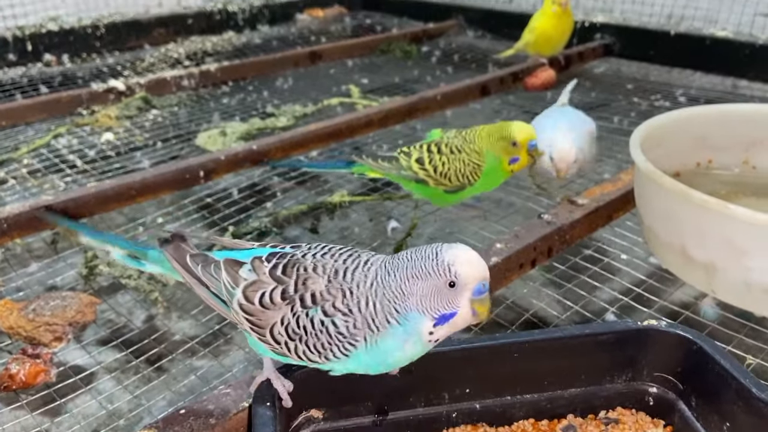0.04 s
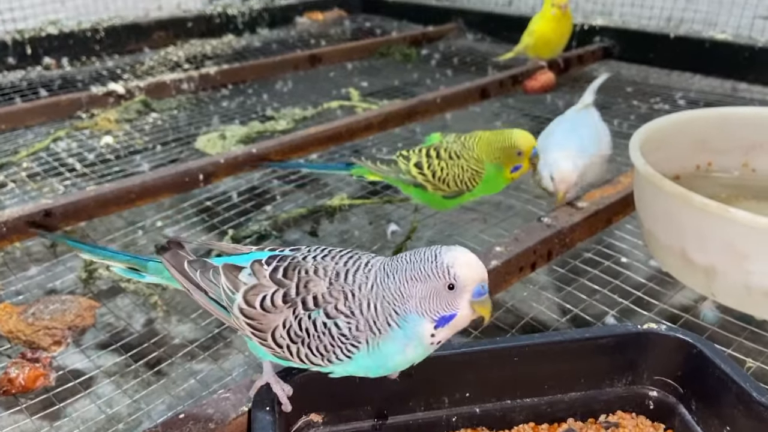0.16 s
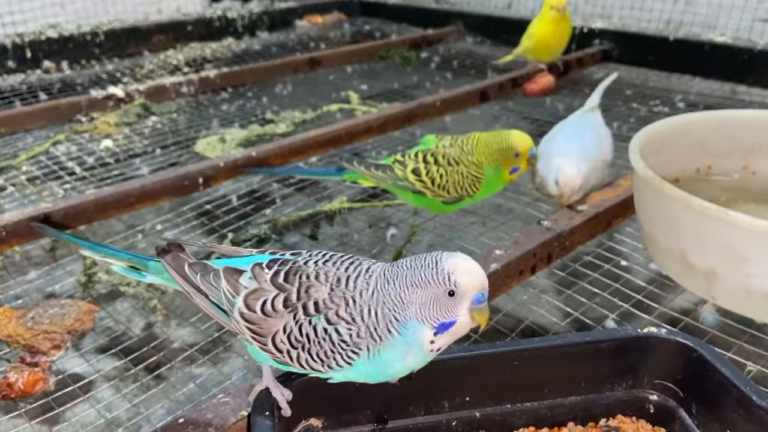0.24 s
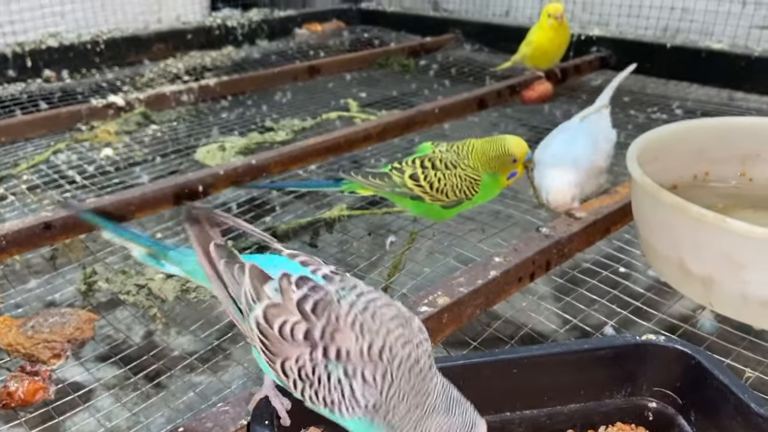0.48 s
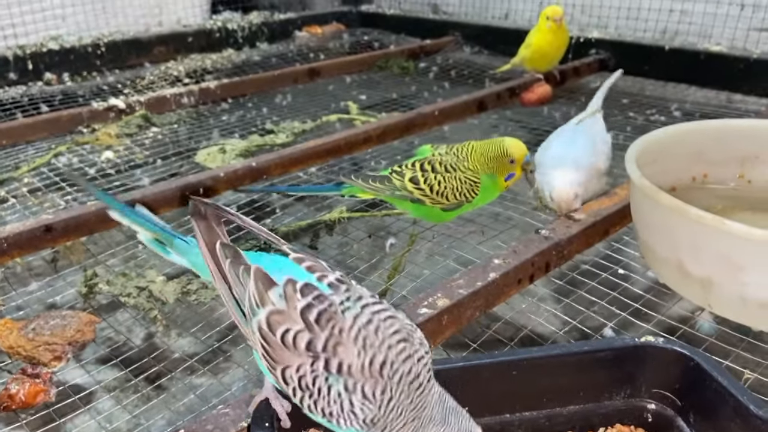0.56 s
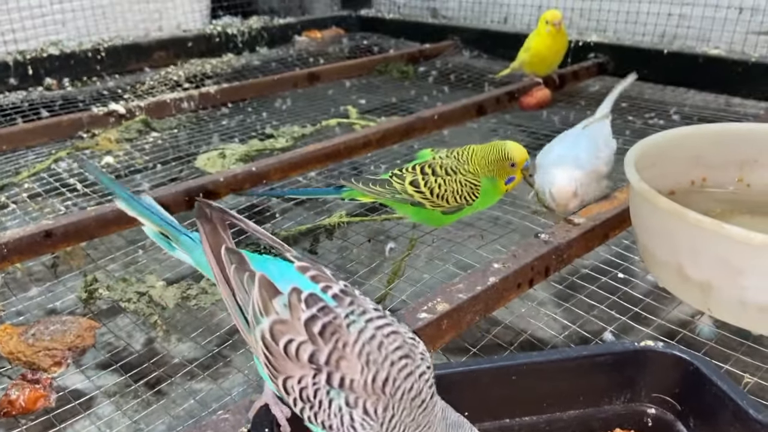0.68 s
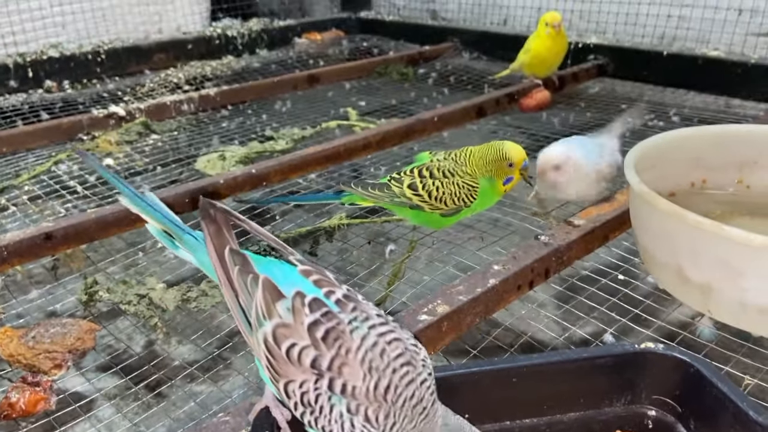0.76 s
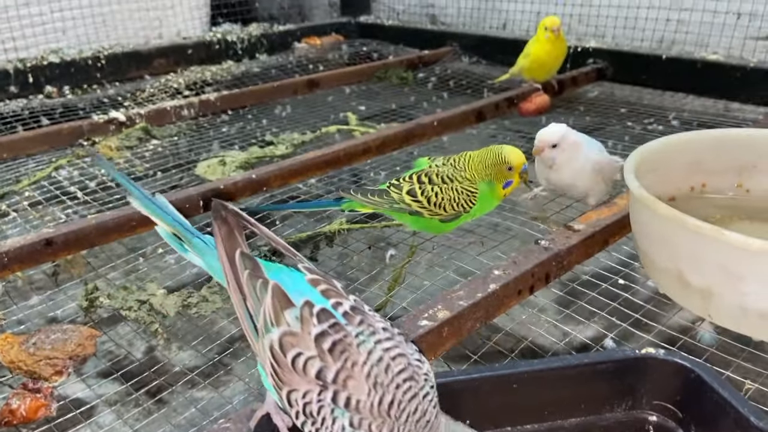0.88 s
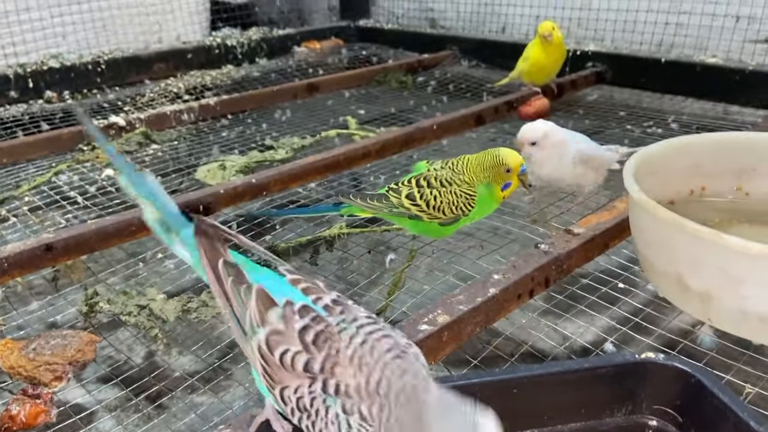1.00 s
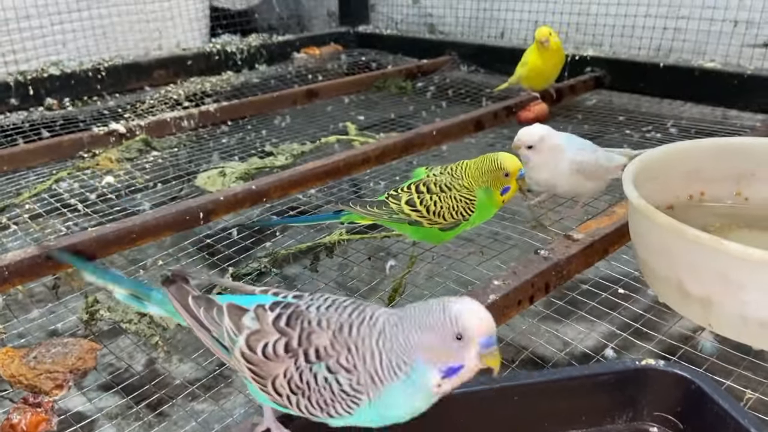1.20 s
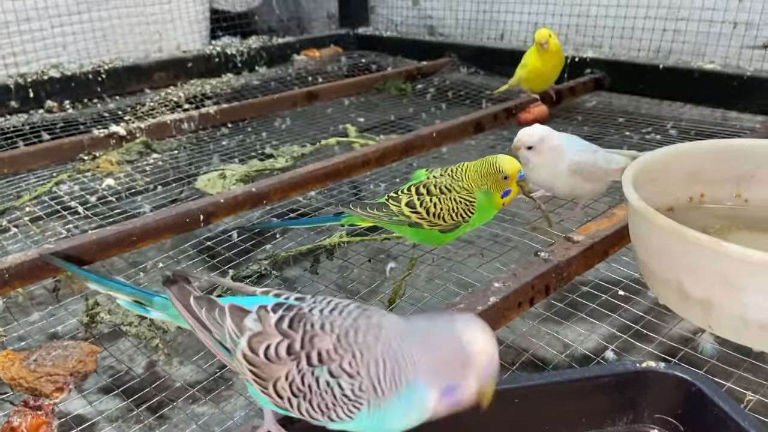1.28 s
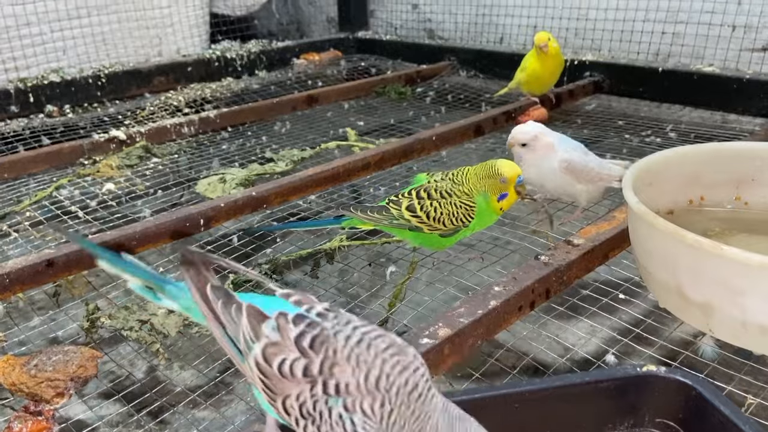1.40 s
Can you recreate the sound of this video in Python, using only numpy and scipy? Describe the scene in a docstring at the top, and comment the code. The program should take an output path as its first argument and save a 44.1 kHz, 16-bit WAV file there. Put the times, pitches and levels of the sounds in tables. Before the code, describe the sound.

Small parrots give short, harsh, buzzing squawks and quick chirps beside light tray knocks and seed cracks.

```python
"""Small parrots in an echoing shed

Pure warbled notes, frequency-gliding tones with two overtones, run into harsh buzzing squawks: pulse trains
and rasp ringing in beak and throat resonances. Beaks knock on a plastic tray and crack seed, heard as decaying
modes. Wire cage and shed answer with noise-tail echoes; a low hum of the place, made of noise bands, and a
little air on the microphone, made of low noise, lie below."""
import sys
import numpy as np
from scipy import signal
from scipy.fft import rfft, irfft
from scipy.io import wavfile

SR = 44100
rng = np.random.default_rng(int(sys.argv[2]) if len(sys.argv) > 2 else 0)


def wrap_up_sound(samples):
    """Save the sound to the file named by the first command line argument, as 16-bit audio."""
    columns = np.atleast_2d(samples).T
    # keep every value between -1 and 1, then stretch to whole-number steps
    tamed = np.clip(columns, -1, 1)
    steps = np.round(tamed * 32767).astype(np.int16)
    wavfile.write(sys.argv[1], SR, steps)


N = 63945
RUN_IN = 4096  # samples ahead of time zero, so that a sound may begin early

# Beak on tray. Each row: start in seconds, level in dB before the gains of modes and thud.
KNOCKS = [(0.004, -39), (0.388, -37), (0.51, -37), (0.567, -44), (0.669, -43.5), (0.79, -52),
          (0.827, -44.5), (1.012, -45), (1.044, -44), (1.209, -47), (1.408, -34.5)]


def from_db(db):
    """Level is logarithmic: 20 dB is a tenfold amplitude."""
    return 10 ** (np.asarray(db) / 20)


def rms_one(x):
    """Normalize to an effective amplitude of one."""
    return x / np.sqrt(np.mean(x ** 2) + 1e-20)


def at_hz(points, hz):
    """Read a spectral curve by interpolation along log frequency."""
    curve_hz, value = np.array(points)[:, 0], np.array(points)[:, 1]
    return np.interp(np.log(hz), np.log(curve_hz), value)


def drift(rate_hz, size):
    """Random modulation: white noise through two equal low-pass poles, effective value one."""
    r = np.exp(-2 * np.pi * rate_hz / SR)
    settle = 4000  # samples dropped while the filter starts
    slow = signal.lfilter([1], [1, -2 * r, r * r], rng.standard_normal(size + settle))
    return rms_one(slow[settle:])


def add(out, s, sound):
    """Superposition: sum a sound in at its start in seconds."""
    i = RUN_IN + int(s * SR)
    out[i:i + len(sound)] += sound[:len(out) - i]


def stereo(mid, side, alike):
    """Two-channel coherence: a shared part plus a part of opposite sign, weighted by likeness."""
    return np.sqrt(1 + alike) * mid + np.sqrt(1 - alike) * side * [[1], [-1]]


def resonance(x, hz, width_hz):
    """Heterodyned two-pole resonance, whose centre may glide."""
    turn = np.exp(2j * np.pi * np.cumsum(hz + 0 * x) / SR)
    r = np.exp(-np.pi * width_hz / SR)
    return np.real(turn * signal.lfilter([1], [1, -2 * r, r * r], x / turn))


def struck(events, modes, spread_s, count):
    """Modal excitation: a few contacts per blow set each mode ringing with random strengths."""
    out = np.zeros(N + RUN_IN)
    for hz, mode_db, t60_s in modes:
        clicks = np.zeros(N + RUN_IN)
        r, w = from_db(-60 / (t60_s * SR)), 2 * np.pi * hz / SR
        for s, db in events:
            late_s = np.r_[0, np.sort(rng.uniform(0, spread_s, count - 1))]
            at = RUN_IN + ((s + late_s) * SR).astype(int)
            clicks[at] = from_db(db + mode_db - 12 + rng.normal(0, 2.5, count))
        # the tiny offset keeps the decaying filter away from denormal numbers
        out += signal.lfilter([0, np.sin(w)], [1, -2 * r * np.cos(w), r * r], clicks + 1e-18)
    return out


def air():
    """Air on the microphone: band-limited low noise of uneven level, nearly coherent on both ports."""
    # Each row: time in seconds, level in dB.
    air_level = [(0.0, -71), (0.12, -65), (0.184, -87), (0.262, -50.5), (0.338, -62.5), (0.354, -66.5),
                 (0.552, -69), (0.634, -60), (0.69, -80), (0.726, -61), (0.766, -73), (0.944, -69),
                 (1.012, -60.5), (1.106, -81), (1.23, -70), (1.244, -63), (1.417, -76), (1.45, -50)]
    band = signal.butter(3, [48, 115], "band", fs=SR, output="sos")
    mid, side = signal.sosfilt(band, rng.standard_normal((2, N)))
    noise = rms_one(mid + from_db(-14) * side * [[1], [-1]])
    s, db = np.transpose(air_level)
    return from_db(np.interp(np.arange(N) / SR, s, db)) * noise


def hum():
    """Hum of the place: half-octave noise bands under independent random amplitude modulation."""
    # Spectrum. Each row: frequency in Hz, relative band level in dB.
    spectrum = [(59, -35), (100, -6.5), (487, -3), (1290, -8), (1460, -28), (1880, -5.5), (3180, -4),
                (3610, 0), (5280, -17.5), (6390, -12.5), (15500, -23.5)]
    # Swells and dips of the whole hum. Each row: time in seconds, change in dB.
    sway = [(0, -3), (0.146, 0), (.45, 3), (.8, 3.5), (.84, -1), (0.898, -3.5), (1, 3), (1.3, 1.5),
            (1.45, -1.5)]
    # Coherence of the two sides. Each row: frequency in Hz, left-right likeness.
    likeness = [(60, 1), (240, 0.95), (950, 0.19), (3770, 0.89), (15000, 1)]
    level_db = -55  # before the swells and dips
    flicker_db, flicker_hz = 3.2, 15
    out, edges_hz = 0, 90 * 2 ** np.arange(0, 7.6, .5)
    white = rng.standard_normal((2, 2, N))  # neighbouring bands take different noises
    for k, (low, high) in enumerate(zip(edges_hz, edges_hz[1:])):
        band = signal.butter(2, [low, high], "band", fs=SR, output="sos")
        mid, side = signal.sosfilt(band, white[k % 2])
        hz = np.sqrt(low * high)
        alike = np.clip(at_hz(likeness, hz), -1, 1)
        gain = from_db(at_hz(spectrum, hz) + flicker_db * drift(flicker_hz, N))
        out = out + gain * stereo(mid, side, alike)
    sway_db = np.interp(np.arange(N) / SR, *np.transpose(sway))
    return from_db(level_db + sway_db) * rms_one(out)


def echo(x, t60_s, db, gap_s, alike):
    """Diffuse reverberation: convolution with exponentially decaying noise after a short gap."""
    dull_hz = 8400  # low-pass corner of the echo
    t = np.arange(SR) / SR
    mid, side = rng.standard_normal((2, SR)) * from_db(-60 * t / t60_s) * (t > gap_s)
    tail = stereo(mid, side, alike)
    tail = tail / np.sqrt(np.sum(tail ** 2) / 2)  # unit energy per side before dulling
    tail = signal.lfilter(*signal.butter(1, dull_hz, fs=SR), tail)
    return from_db(db) * signal.fftconvolve(tail, x[None])[:, :len(x)]


def surroundings(near):
    """Early and late reflections: quick echoes off floor, bowl and tray, and the longer shed echo."""
    cage = echo(near, t60_s=.035, db=-9, gap_s=.001, alike=0)
    shed = echo(near, t60_s=.5, db=-10, gap_s=.0072, alike=.55)
    return cage + shed


def two_ports(heard):
    """Interaural-style cues: level and phase differences, split evenly between left and right."""
    # Each row: frequency in Hz, left over right in dB.
    lean = [(60, -1), (300, 0), (700, -1.5), (1300, -0.5), (2400, 3), (4400, 4), (8000, -0.5), (15000, 0)]
    # Each row: frequency in Hz, phase in radians by which the left port leads.
    lead = [(1, 0), (700, 0), (1460, .8), (2200, .4), (3500, .8), (6600, .5), (7800, 0), (8500, -2.9),
            (9500, -3.4), (10200, -5.6), (11800, -6.4), (12600, -9.3), (13700, -9.5), (14400, -12.3),
            (16200, -12.8)]
    size = N + RUN_IN
    hz = np.maximum(np.fft.rfftfreq(size, 1 / SR), 1)
    half = from_db(at_hz(lean, hz) / 2) * np.exp(.5j * at_hz(lead, hz))
    return irfft(rfft(heard, size) * np.array([half, 1 / half]), size)[:, :N]


def seed_cracks():
    """Cracking husks: closely spaced impulses excite short, high modes."""
    # Each row: start in seconds, level in dB before the mode gains.
    cracks = [(0.166, -53.5), (0.187, -38), (0.2455, -42), (0.2831, -39), (0.4908, -45.5), (0.9953, -43),
              (1.071, -38), (1.1366, -37), (1.283, -43), (1.3417, -43.5), (1.39, -39)]
    # Each row: mode frequency in Hz, gain in dB, time in seconds to fall by 60 dB.
    husk = [(5460, 10.5, 0.0035), (6440, -3.5, 0.047), (8350, 13, 0.0037), (11350, 11, 0.0011),
            (13500, 2, 0.0011)]
    return struck(cracks, husk, spread_s=.0016, count=3)


def tray_knocks():
    """Knocks on plastic: double contacts excite the low modes of the tray."""
    # Each row: mode frequency in Hz, gain in dB, time in seconds to fall by 60 dB.
    tray = [(240, -7, .05), (440, -2, .13), (520, -2, .12), (640, -4, .08), (960, 1, .02), (1250, -1, .015)]
    return struck(KNOCKS, tray, spread_s=.00312, count=2)


def thuds():
    """The dull body of each knock: band-limited low noise under a fast exponential decay."""
    gain_db, decay_s, top_hz = -10, .01, 1300
    out, t = np.zeros(N + RUN_IN), np.arange(SR // 8) / SR
    band = signal.butter(2, [130, top_hz], "band", fs=SR, output="sos")
    for s, db in KNOCKS:
        noise = signal.sosfilt(band, rng.standard_normal(len(t)))
        add(out, s, from_db(db + gain_db) * rms_one(noise) * np.exp(-t / decay_s))
    return out


def warble():
    """Frequency-modulated harmonic tones that fade; random amplitude and phase modulation roughens them."""
    # Each row: start in seconds, length in seconds without the added edge, pitch from and to in Hz,
    # level in dB near mid-note, second-harmonic gain in dB, roughness 0-1 (raised to the least below).
    notes = [(0.212, 0.018, 2870, 3000, -49, -11, 0.4), (0.208, 0.018, 1824, 1830, -50.5, -5, 0.2),
             (0.219, 0.012, 2286, 2316, -43.5, 2.5, 0.3), (.225, .007, 2740, 2920, -43.5, -24, 0.2),
             (0.231, 0.024, 2555, 2610, -42, -10.5, 0.25), (0.2555, 0.0086, 2378, 1850, -34, -14, 0),
             (.265, 0.006, 2090, 3380, -41, -16, 0.2), (0.2692, 0.013, 3724, 3555, -33.5, -20, 0),
             (0.2756, 0.016, 2994, 3060, -34, -33, 0.13), (0.284, 0.0031, 1570, 1870, -42, -3, 0),
             (.289, 0.0055, 3300, 4070, -33.5, -14.5, 0.1), (0.2939, 0.0052, 3840, 3470, -38, -20, 0.3),
             (0.298, 0.011, 3150, 2966, -27.5, -24, 0.1), (0.31, .007, 3550, 3780, -32.5, -25, 0.18),
             (0.499, 0.014, 3130, 2920, -65, -22, 0.1), (0.508, 0.012, 2520, 2530, -51.5, -3.5, 0.1),
             (0.525, 0.0097, 2540, 2446, -44, 0.5, 0.04), (.538, 0.0065, 2450, 2390, -48, -5, 0),
             (.548, 0.0094, 2395, 2440, -46.5, -12, 0.15), (0.552, 0.011, 3020, 3800, -43.5, -22, 0.9),
             (.563, 0.016, 3720, 3910, -36, -20, 0), (0.574, 0.017, 3840, 3940, -35, -14.5, 0.13),
             (0.586, 0.014, 4270, 4530, -52, -20, 0.5), (.600, .036, 3873, 3670, -48.5, -8, 0.76),
             (1.335, 0.012, 4160, 4580, -54.5, 2, 0.7), (1.344, 0.0073, 3520, 3340, -48, -12, 0.5),
             (1.35, 0.0061, 2110, 3000, -49, -7, 0.66), (1.357, .015, 3300, 3280, -47, -9.5, 0.2),
             (1.373, 0.017, 2890, 2690, -47.5, -15, 0.1), (1.377, .0045, 2160, 2250, -49, -10, 0.2),
             (1.390, 0.0062, 2790, 2820, -40.5, -26, 0.2), (1.395, .0055, 2410, 2230, -43.5, -5, .2),
             (1.408, 0.012, 2530, 3070, -48.5, -24, 0.9), (1.417, .009, 3860, 3450, -52.5, 0, 0.8),
             (1.426, 0.0081, 3480, 3600, -46, -9, 0.4), (1.429, 0.012, 2737, 2200, -45.5, -12, 0.67),
             (1.442, .018, 2360, 2510, -44.5, -18, .2)]
    waver_hz, waver_rate_hz = 61, 276  # pitch spread and its speed
    rasp_hz, least_rough = 900, .33
    edge_s, fade_db_per_s = .0015, -350
    third_db, top_hz = -8.5, 9500  # third harmonic relative to the second; low-pass corner
    out, waver = np.zeros(N + RUN_IN), drift(waver_rate_hz, N + SR)
    rasp = (drift(rasp_hz, N + SR) + 1j * drift(rasp_hz, N + SR)) / np.sqrt(2)
    for s, length, hz0, hz1, db, over_db, rough in notes:
        t = np.arange(int((length + edge_s) * SR)) / SR
        here = int(s * SR) + np.arange(len(t))
        rough = np.clip(rough, least_rough, 1)
        pitch_hz = hz0 + (hz1 - hz0) * t / t[-1] + waver_hz * waver[here]
        turn = np.exp(2j * np.pi * np.cumsum(pitch_hz) / SR)
        shape = np.sin(np.pi / 2 * np.clip(np.minimum(t, t[-1] - t) / edge_s, 0, 1)) ** 2
        tone = turn + from_db(over_db) * (turn ** 2 + from_db(third_db) * turn ** 3)
        tone = np.imag(tone * (np.sqrt(1 - rough ** 2) + rough * rasp[here]))
        # the fade stops 10 ms past mid-note
        fade_db = fade_db_per_s * np.minimum(t - t[-1] / 2, .01)
        add(out, s, np.sqrt(2) * from_db(db + fade_db) * shape * tone)
    return signal.sosfilt(signal.butter(4, top_hz, fs=SR, output="sos"), out)


def squawks():
    """Source-filter voice: uneven pulses with puffs of rasp excite beak and throat resonances."""
    # Each row: start in seconds, length in seconds, share before the crest, pointedness of the swell
    # (raised to at least 0.9), steady share of the rasp, pulses per second, beak resonance from and to in Hz,
    # level in dB of the beak part before the swell, then dB of each throat resonance relative to it.
    calls = [(-.06, 0.068, 0.57, 1.6, 0.57, 171.9, 4370, 4170, -29.5, -11, -36, -30, -40, -36, -37, -33, -30),
             (.304, 0.059, 0.69, 1.5, 1, 167.8, 4670, 4570, -26.5, -8.5, -4.5, -31, -5, -9, -25, -22.5, -18),
             (0.604, 0.026, 0.55, 1.3, .6, 285, 6400, 6200, -45.5, -38, 0.5, -23, -11, -6, -5, -14, -41),
             (.622, 0.057, 0.45, 1.18, 0.37, 225.6, 6420, 6330, -26.5, -29, -9.5, -8, -5.5, -0.5, -12.5, -9.5, -15.5),
             (0.905, 0.055, 0.25, 0.42, 0.58, 194, 2900, 3140, -48.5, -29, -14, -7, 2, -12, -14, -26, -15),
             (.919, 0.047, 0.56, 0.85, 0.91, 200, 6900, 5700, -34.5, -17.5, -9, 0, 1, -2.5, -5, -5.5, -20),
             (1.002, 0.068, 0.43, 1.38, 0.62, 176.6, 6460, 6600, -29.5, -16.5, -8, -7.5, -6, -4.5, -14, -15.5, -19.5),
             (1.087, 0.085, 0.26, 0.8, 0.34, 186, 6700, 5230, -40, -18.5, -7.5, -0.5, 2, -4, -9.5, -12.5, -18),
             (1.129, 0.071, 0.32, 1.36, 1, 181, 5100, 3680, -44.5, -9.5, 5.5, -16, 5, 7, -4, -5, -11)]
    # Each row: throat resonance in Hz, width in Hz.
    throat = [(2100, 900), (3300, 1400), (4100, 900), (5100, 800), (7100, 600), (7700, 500), (9000, 1600),
              (11500, 6000)]
    jitter, pulse_spread_db = .09, 1  # spread of pulse spacing (share) and of pulse level
    open_s, rasp_share = .0009, .5  # time constant of a puff; weight of rasp against pulses
    beak_width_hz, floor_hz = 520, 1580  # resonance width; high-pass corner
    throat_leak = .35  # the throat is breathier than the beak
    grit_db, grit_hz = 2, 60  # throat resonances come and go
    out = np.zeros(N + RUN_IN)
    for s, length, crest, swell, leak, rate, hz0, hz1, db, *throat_db in calls:
        t = np.arange(int(length * SR)) / SR
        chance = rng.standard_normal((2, 40))
        noise = rng.standard_normal((2, SR // 8))[:, :len(t)]
        at_s = (np.cumsum(np.clip(1 + jitter * chance[0], .3, 2)) - .5) / rate
        inside = at_s < t[-1]
        pulses = np.zeros(len(t))
        pulses[(at_s[inside] * SR).astype(int)] = from_db(pulse_spread_db * chance[1][inside])
        puff_poles = np.poly([np.exp(-1 / (open_s * SR))] * 2)
        puffs = rms_one(signal.lfilter([1], puff_poles, pulses))
        rasp = rms_one((puffs + leak) * noise[0])
        source = (1 - rasp_share) * rms_one(pulses) + rasp_share * rasp
        voice = rms_one(resonance(source, hz0 + (hz1 - hz0) * t / length, beak_width_hz))
        breath = (puffs + leak + throat_leak) * noise[1]
        for (hz, width_hz), gain_db in zip(throat, throat_db):
            grit = from_db(grit_db * drift(grit_hz, SR // 8)[:len(t)])
            voice = voice + from_db(gain_db) * rms_one(grit * resonance(breath, hz, width_hz))
        progress = np.interp(t / length, [0, crest, 1], [0, .5, 1])
        envelope = np.sin(np.pi * progress) ** max(swell, .9)
        add(out, s, from_db(db) * voice * envelope)
    return signal.sosfilt(signal.butter(4, floor_hz, "high", fs=SR, output="sos"), out)


def scene():
    """Superposition: birds, tray, seed, their echoes and the hum reach two ports; air is added there."""
    near = warble() + squawks() + seed_cracks() + tray_knocks() + thuds()
    heard = (near + surroundings(near))[:, RUN_IN:] + hum()
    return two_ports(heard) + air()


def record(dry):
    """Band limiting: a steep low-pass, 60 dB down from its stop-band edge at 16100 Hz, cuts the top."""
    return signal.sosfilt(signal.cheby2(20, 60, 16100, fs=SR, output="sos"), dry)


dry = scene()
out = record(dry)
wrap_up_sound(out)
```